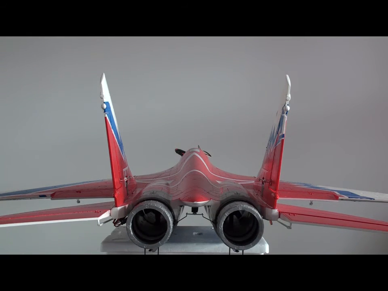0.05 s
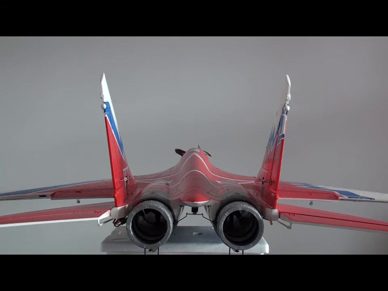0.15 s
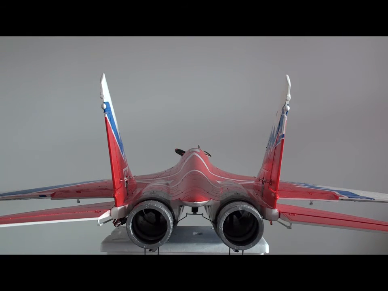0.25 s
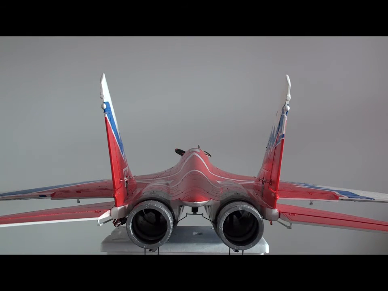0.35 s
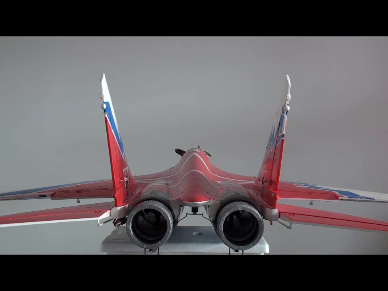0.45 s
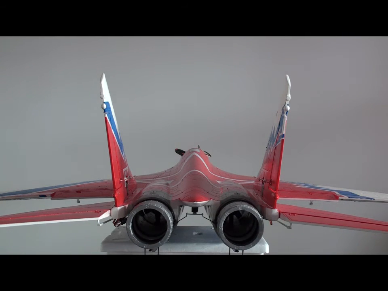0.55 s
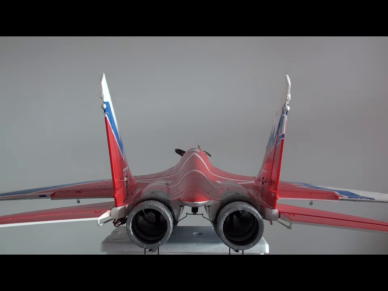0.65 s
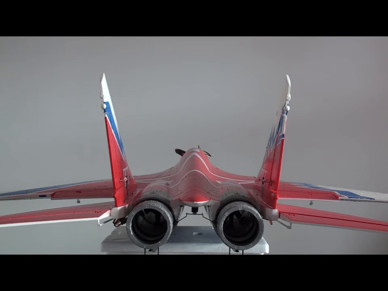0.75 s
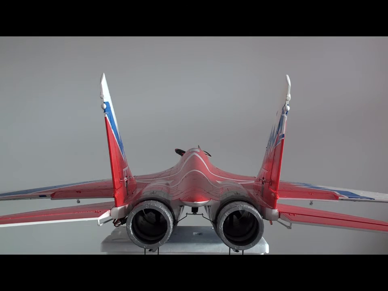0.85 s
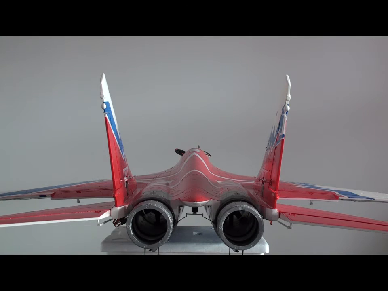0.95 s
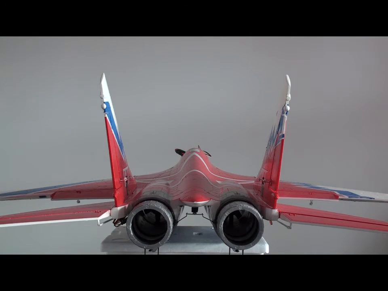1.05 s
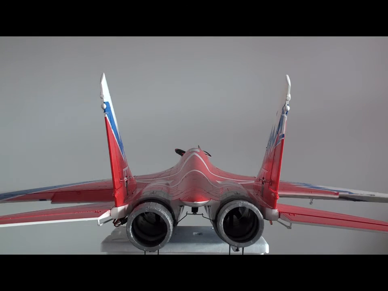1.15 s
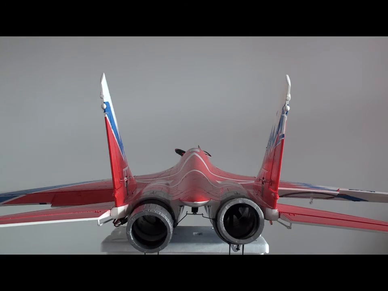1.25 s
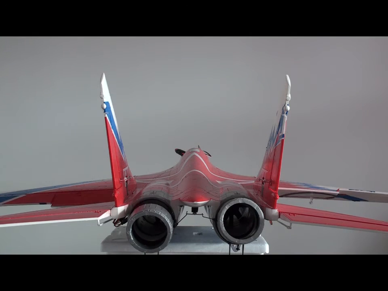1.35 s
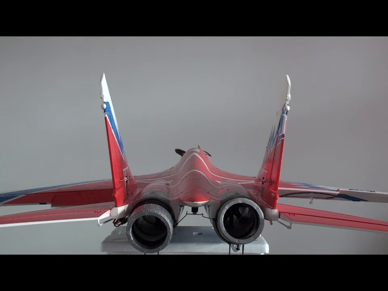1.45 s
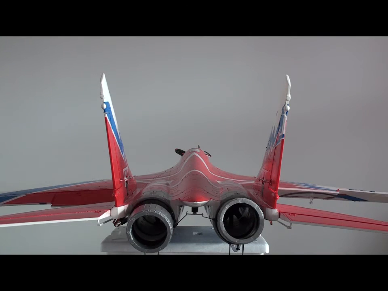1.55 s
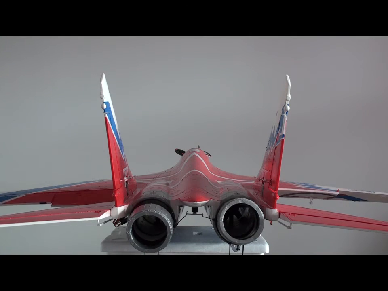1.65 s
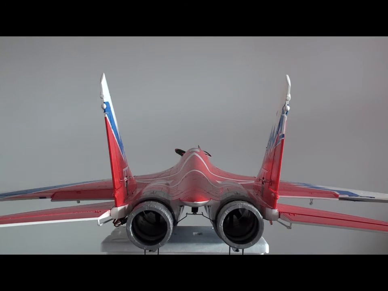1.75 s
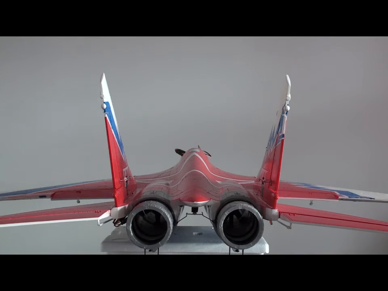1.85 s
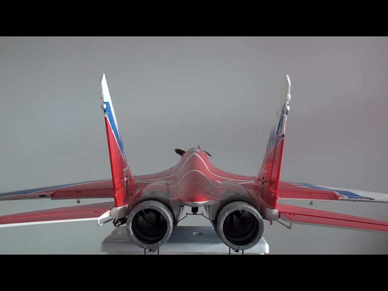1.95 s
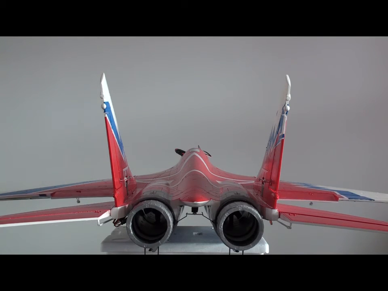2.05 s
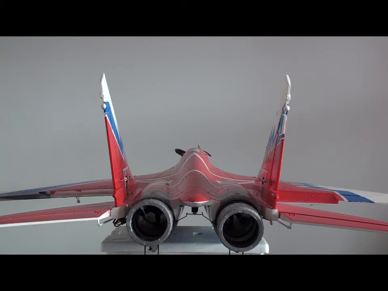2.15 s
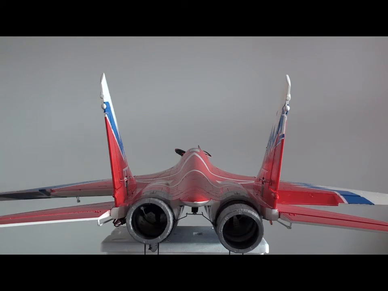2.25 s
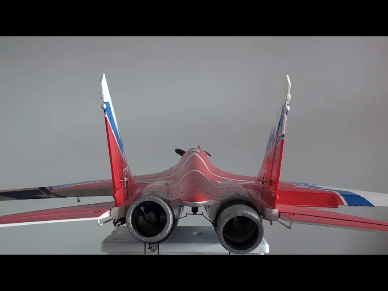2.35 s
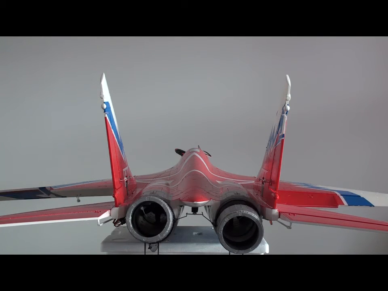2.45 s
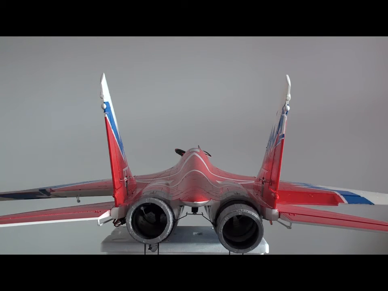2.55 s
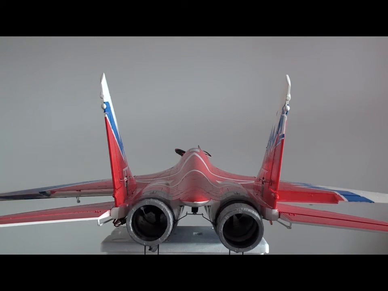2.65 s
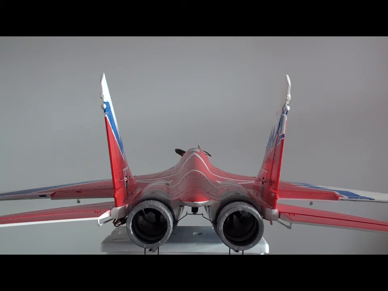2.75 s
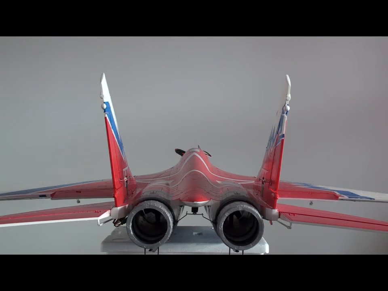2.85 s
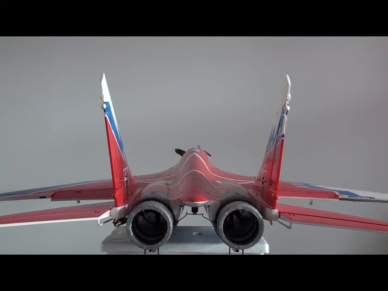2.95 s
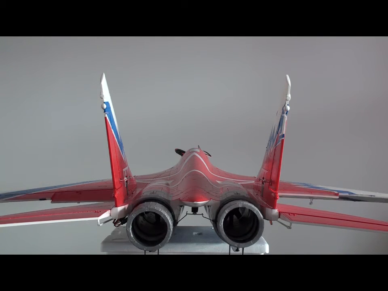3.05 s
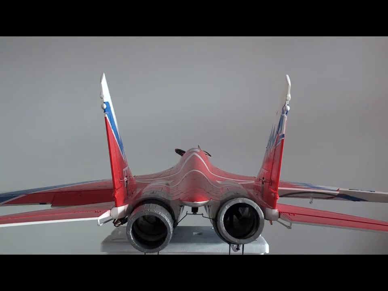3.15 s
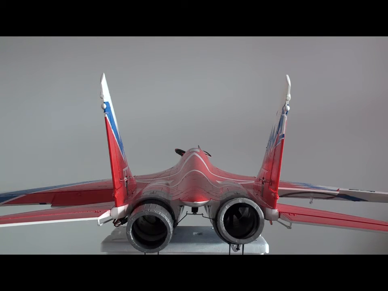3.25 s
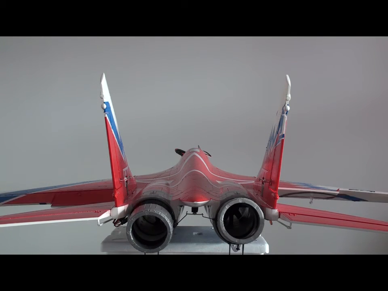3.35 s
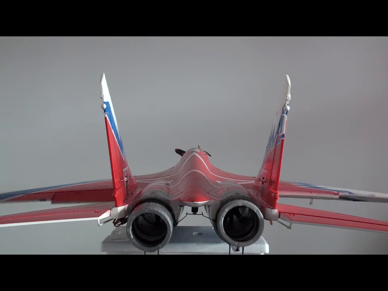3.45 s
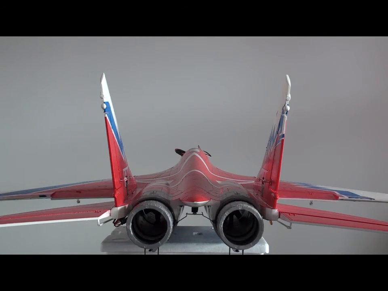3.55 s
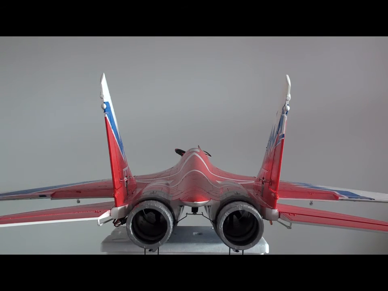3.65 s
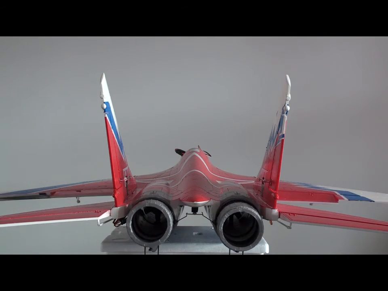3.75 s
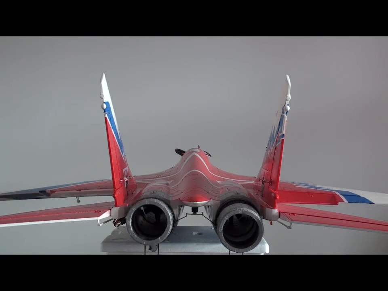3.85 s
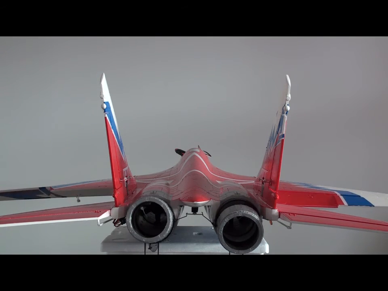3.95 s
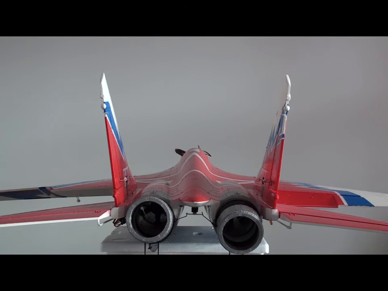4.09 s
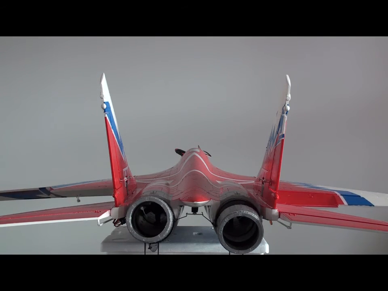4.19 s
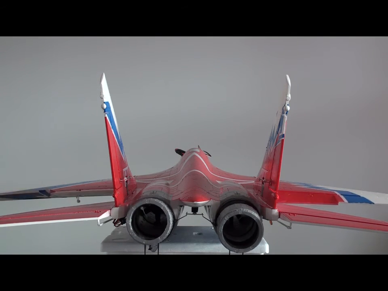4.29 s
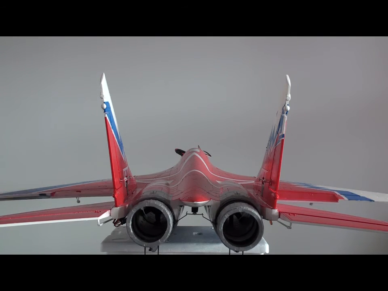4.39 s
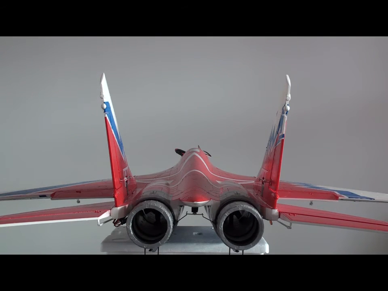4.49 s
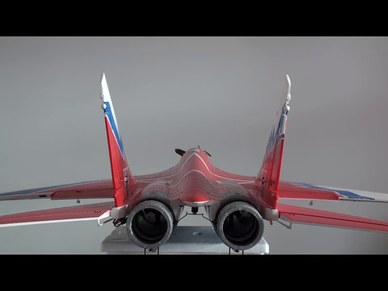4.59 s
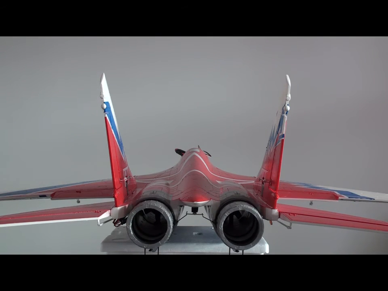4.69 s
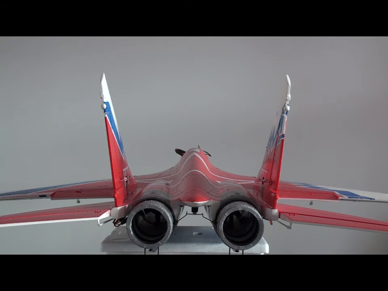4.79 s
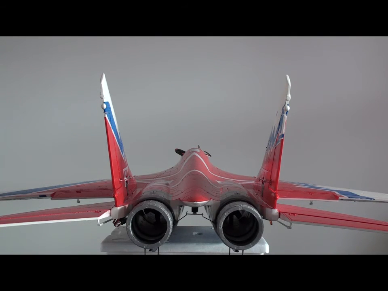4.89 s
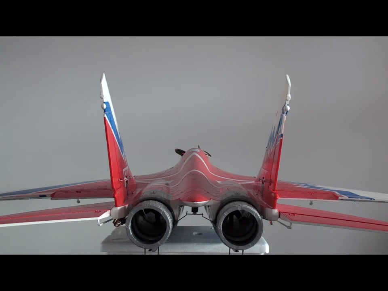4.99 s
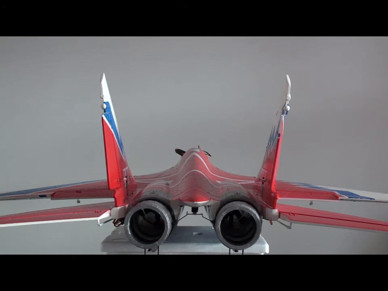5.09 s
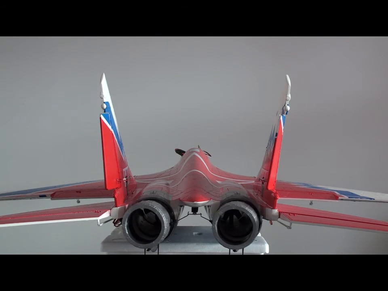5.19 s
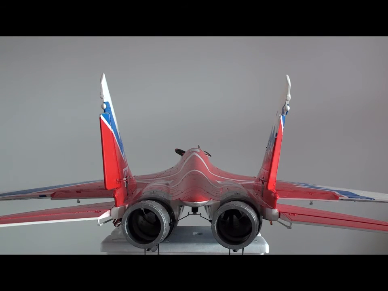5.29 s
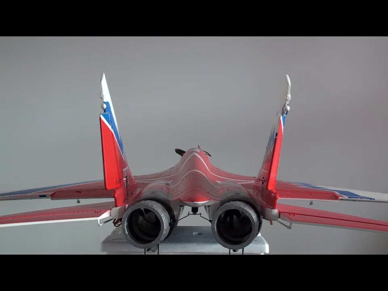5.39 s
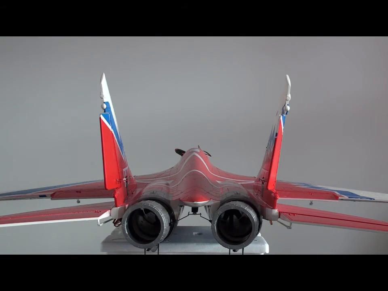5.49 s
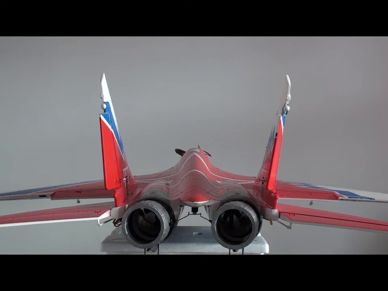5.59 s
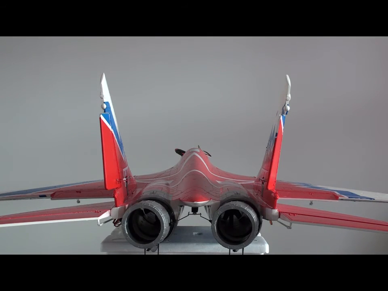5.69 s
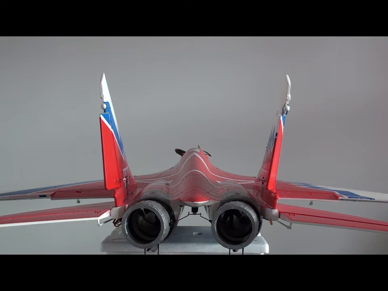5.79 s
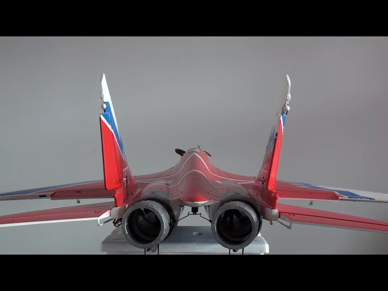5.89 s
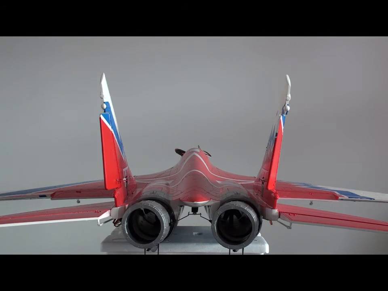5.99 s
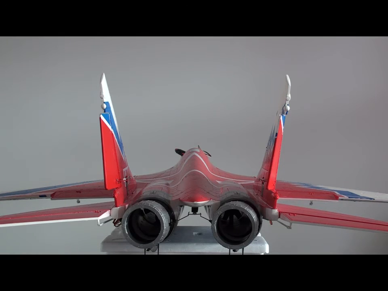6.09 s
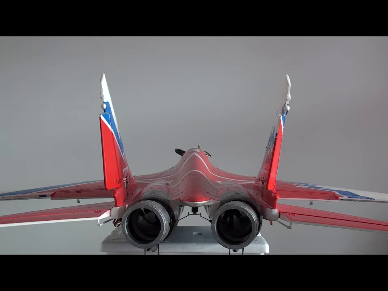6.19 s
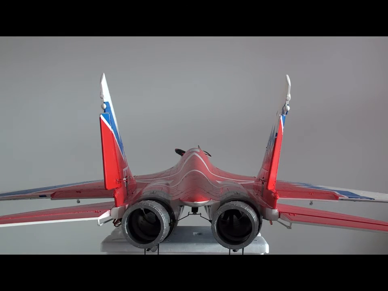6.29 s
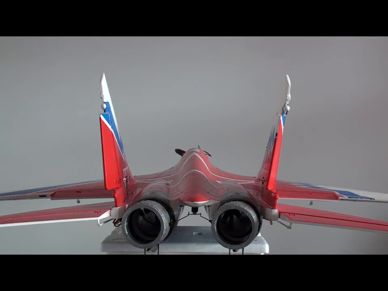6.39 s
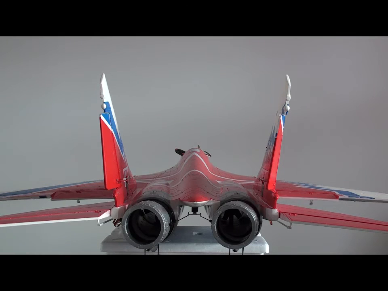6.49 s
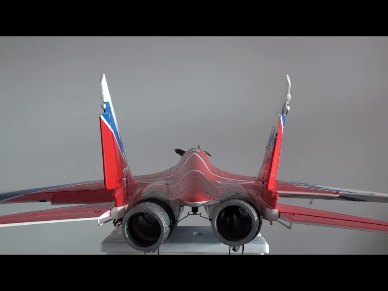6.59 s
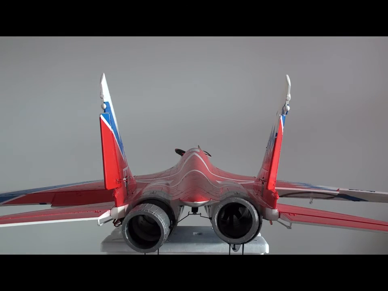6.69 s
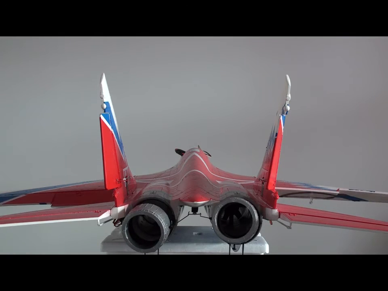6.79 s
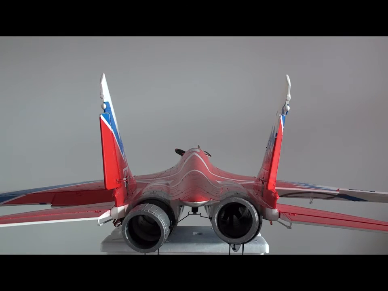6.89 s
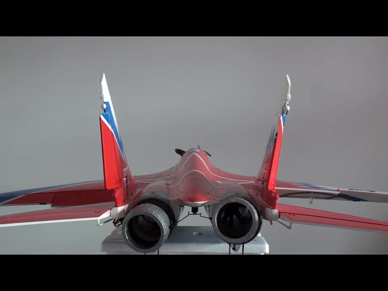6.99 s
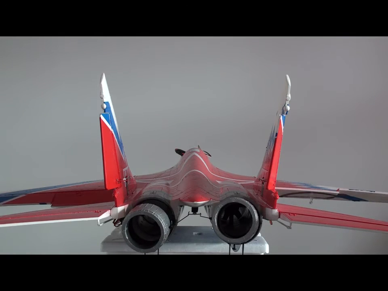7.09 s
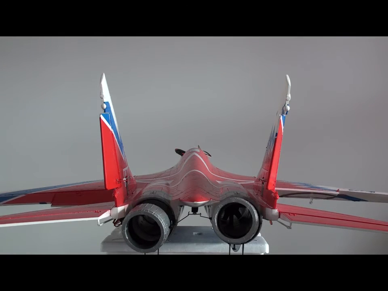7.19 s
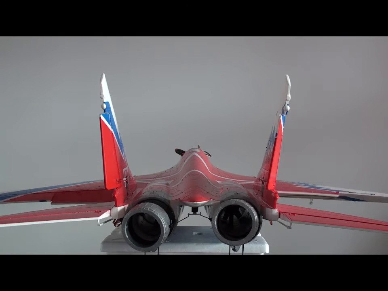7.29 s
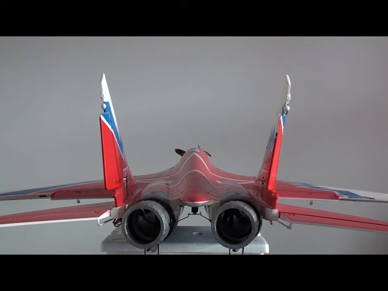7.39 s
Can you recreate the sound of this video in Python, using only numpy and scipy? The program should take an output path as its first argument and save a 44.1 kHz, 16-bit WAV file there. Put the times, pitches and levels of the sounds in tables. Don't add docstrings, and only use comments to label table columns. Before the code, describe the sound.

In a quiet room, tiny geared servos on a model jet buzz faintly and twitch at rest. After about a second, short rising whirs throw the flaps out and snap them back, rattling the hollow shell and tail pipes with soft low thuds. A lighter rudder whir follows, then ticking, one more throw and a return. Close stereo microphone, centred source, soft hiss.

```python
import sys
import numpy as np
from scipy import signal
from scipy.fft import rfft, irfft
from scipy.io import wavfile
from scipy.ndimage import uniform_filter1d

SR = 44100
rng = np.random.default_rng(int(sys.argv[2]) if len(sys.argv) > 2 else 0)


def natural_amplitude(level_db):
    exponent = np.asarray(level_db, float) / 20
    return 10 ** exponent


def inscribe(sig):
    pcm = np.round(np.clip(np.atleast_2d(sig).T, -1, 1) * 32767)
    wavfile.write(sys.argv[1], SR, pcm.astype(np.int16))


N = 328104
TIME = np.arange(N) / SR


def rms_one(x):
    return x / np.sqrt(np.mean(x ** 2) + 1e-20)


def at_hz(points, hz):
    table_hz, values = np.transpose(points)
    return np.interp(np.log(hz), np.log(table_hz), values)


def drift(rate):
    r = np.exp(-80 * np.pi * rate / SR)
    white = rng.standard_normal(N // 40 + 2002)
    slow = signal.lfilter([1], [1, -2 * r, r * r], white)[2000:]
    return np.interp(np.arange(N) / 40, np.arange(len(slow)), rms_one(slow))


def band(x, low_hz, high_hz):
    return signal.sosfilt(signal.butter(2, [low_hz, high_hz], "band", fs=SR, output="sos"), x)


def level(x, low_hz, high_hz):
    return x / np.sqrt(np.mean(band(x, low_hz, high_hz) ** 2))


def peak(x, hz, width_hz):
    r, w = np.exp(-np.pi * width_hz / SR), 2 * np.pi * hz / SR
    return signal.lfilter((1 - r * r) / 2 * np.array([1, 0, -1]), [1, -2 * r * np.cos(w), r * r], x)


def resonate(x, modes):
    for hz, width_hz, lift_db in modes:
        x = x + (natural_amplitude(lift_db) - 1) * peak(x, hz, width_hz)
    return x


def lag(x):
    return signal.lfilter([.03], [1, -.97], x)


def moves(rows, fall_db_s, clock, rest_db=-80):
    db, extra = np.full(N, rest_db * 1.), np.zeros(N)
    for s, length, start_db, end_db, *more in rows:
        stop = s + length + (end_db - rest_db) / fall_db_s
        span = slice(round(s * SR), round(stop * SR) + 1)
        age = np.maximum(clock[span] - s, 0)
        ramp = np.interp(age, [0, length], [start_db, end_db])
        own = ramp - fall_db_s * np.maximum(age - length, 0)
        extra[span] = np.where(own > db[span], sum(more), extra[span])
        db[span] = np.maximum(own, db[span])
    return db, extra


def tooth_knocks(per_s, spread_db, rasp_db):
    size_db = spread_db * np.minimum(rng.exponential(1, (2, N)), 4)
    sizes = natural_amplitude(size_db) * rng.choice([-1, 1], (2, N))
    contact = rng.random((2, N)) < per_s / SR
    return rms_one(natural_amplitude(rasp_db * drift(95)) * sizes * contact + 1e-18)


def gear_train(knocks, colour, tilt_db, patchy_db, low_hz):
    out = 0
    edges = low_hz * 2 ** np.arange(0, np.log2(17000 / low_hz), .5)
    for k, (low, high) in enumerate(zip(edges, np.append(edges[1:], 19000))):
        hz = np.sqrt(low * min(high, 1.42 * low))
        flicker = patchy_db * (drift(11.8) + 0.24 * drift(21))
        gain_db = at_hz(colour, hz) + flicker + tilt_db(hz)
        out = out + natural_amplitude(gain_db) * band(knocks[k % 2], low, high)
    return out


# (frequency [Hz], density [dB per Hz])
AIR_COLOUR = [(20, -17), (45, -1), (70, -7.5), (120, -5.5), (250, -1.5), (800, -1.5), (2500, -5),
              (6000, -14.5), (12000, -24), (16500, -24)]
# (frequency [Hz], left-right likeness [0..1])
AIR_LIKENESS = [(35, .99), (70, 0.63), (130, 0.56), (400, 0.12), (1500, 0.14), (5000, 0.6), (15000, 0.54)]
# (frequency [Hz], level [dB])
HUM = [(70.0, -76.5)]


def air():
    hz = np.maximum(np.arange(N // 2 + 1) * SR / N, 10)
    mid, side = rfft(rng.standard_normal((2, N)))
    alike = np.clip(at_hz(AIR_LIKENESS, hz), 0, 1)
    pair = np.sqrt(1 + alike) * mid + np.sqrt(1 - alike) * side * [[1], [-1]]
    noise = rms_one(irfft(pair * natural_amplitude(at_hz(AIR_COLOUR, hz)), N))
    hum = 0
    for f, db in HUM:
        hum = hum + natural_amplitude(db + 2.3 * drift(1.2)) * np.sqrt(2) * np.sin(2 * np.pi * f * TIME)
    return natural_amplitude(-54.5) * noise + hum


# (time [s], length [s], buzz at start [dB], buzz at end [dB])
BOUTS = [(0, 0.16, -50.5, -52), (0.227, 0.057, -51.5, -52), (0.337, 0.19, -52, -49.5),
         (0.576, 0.25, -52.5, -52), (0.839, 0.017, -50, -48.5), (0.922, .008, -59, -51.5),
         (0.994, 0.044, -55, -50), (1.108, 0.45, -54, -53), (1.568, 0.054, -50.5, -48),
         (1.653, 0.11, -57.5, -59), (1.743, 0.85, -52, -48.5), (2.628, .865, -47.5, -50),
         (3.5, 0.69, -49, -44.5), (4.208, 0.025, -46, -45), (4.262, 0.43, -46, -48.5),
         (4.736, 0.22, -54, -48), (4.93, 0.53, -50, -53), (5.507, 0.048, -48, -57),
         (5.548, 0.062, -49, -50.5), (5.691, 0.032, -54, -48.5), (5.732, .07, -55, -49),
         (5.802, 0.069, -52, -50), (5.927, 0.067, -55.5, -47.5), (5.98, 0.13, -51.5, -48.5),
         (6.149, 0.078, -51, -50), (6.298, 0.23, -51.5, -51), (6.55, 0.61, -54, -50.5),
         (6.992, 0.22, -51, -54.5), (7.2, 0.05, -49, -50), (7.247, 0.22, -58.5, -44)]
# (frequency [Hz], density [dB per Hz])
HUNT_COLOUR = [(400, -28), (700, -2), (1200, -4.5), (1900, -3), (2600, -3), (4000, -2), (5800, -8),
               (6600, -12.5), (9000, -15), (10000, -25.5), (16000, -43)]
# (frequency [Hz], width [Hz], lift [dB])
HUNT_MODES = [(1490, 100, 4), (2100, 90, 5), (2260, 150, 7), (2440, 70, 4), (2990, 170, 7.5),
              (3760, 140, 5), (4410, 80, 4), (5400, 300, 5), (5870, 80, 4), (7300, 120, 3), (8820, 120, 5)]


def hunting():
    buzz_db = moves(BOUTS, 250, TIME, rest_db=-68)[0] + .8 * drift(9.8)
    fresh = [(s, .001, 0, 0) for s, *_ in BOUTS]
    fizz_db = 0.5 * drift(15) + moves(fresh, 42, TIME, rest_db=-0.52)[0]

    def tilt_db(hz):
        return (fizz_db + 2.0) * np.interp(np.log(hz), np.log([5000, 8500]), [0, 1])

    knocks = tooth_knocks(6000, 3.2, rasp_db=-0.24)
    body = gear_train(knocks, HUNT_COLOUR, tilt_db, patchy_db=0.6, low_hz=517)
    return resonate(lag(natural_amplitude(buzz_db - 1.5)) * level(body, 1300, 7300), HUNT_MODES)


# (frequency [Hz], reverberation time T60 [s])
ROOM_T60 = [(100, 0.24), (1000, 0.26), (5000, 0.12), (15000, 0.023)]
# (frequency [Hz], level [dB])
ROOM_COLOUR = [(100, 13), (700, 12), (3000, 12.5), (8000, 8), (14000, 18)]


def room(x):
    age = np.arange(round(.5 * SR)) / SR
    white, tail = rng.standard_normal((2, len(age))), 0
    for low in 80 * 2. ** np.arange(8):
        t60 = at_hz(ROOM_T60, low * 1.4)
        decay = natural_amplitude(at_hz(ROOM_COLOUR, low * 1.4) - 60 * age / t60)
        tail = tail + band(white, low, min(2 * low, 19000)) * decay / np.sqrt(t60)
    tail = tail * (age > .002) / np.sqrt(SR / 14)
    return signal.fftconvolve(x[None], tail, axes=1)[:, :N]


# (time [s], peak [dB])
TWITCHES = [(.4673, -40), (.5214, -41), (.6285, -41), (.7692, -44), (1.117, -41), (1.1837, -26.5),
            (1.5594, -43), (1.7579, -35), (2.1131, -34), (2.6324, -33), (2.9854, -33), (3.062, -34),
            (3.0939, -25.5), (3.5144, -32), (3.8004, -30), (4.259, -34), (4.9454, -34), (4.9494, -32),
            (5.004, -27), (5.2317, -26), (5.551, -38), (5.8012, -39.5), (5.9748, -53), (6.1449, -43),
            (6.3003, -38.5), (6.5684, -39), (6.5884, -40), (7.0848, -42), (7.3248, -29.5), (7.3687, -22)]
# (frequency [Hz], width [Hz], lift [dB])
TWITCH_MODES = [(4970, 340, 8.5), (7560, 240, 8.5), (8600, 230, 5), (11600, 850, 5.5)]


def twitches():
    opening = [(s, start_db + 1) for s, _, start_db, _ in BOUTS[1:]]
    rows = TWITCHES + opening
    out, age = np.zeros(N), np.arange(round(.08 * SR)) / SR
    draws = rng.standard_normal((len(rows), 2, len(age)))
    for (s, peak_db), (noise, size) in zip(rows, draws):
        spray = rms_one(noise * natural_amplitude(5 * size)) * natural_amplitude(-60 * age / .08)
        hz = 7300 * (1 + .07 * size[-1])
        tuned = band(spray, hz / 1.46, min(hz * 1.08, 16000)) * 0.5
        tuned = tuned + band(spray, 2500, 10500) * 0.5
        i = round(s * SR)
        out[i:i + len(age)] += natural_amplitude(peak_db - 6) * tuned[:N - i]
    return resonate(out, TWITCH_MODES)


# (time [s], level [dB])
NOZZLES = [
    (1.1, -0.5),
    (2.5, -4),
    (2.75, -0.5),
    (3.05, 0.5),
    (3.65, -2),
    (4.2, 3.5),
    (4.5, -5.5),
    (7.44, 0),
]


def tail_pipe(knocks, drive_db):
    pipe_hz, width_hz = 722, 45
    shaking_db = np.interp(TIME, *np.transpose(NOZZLES))
    ring = peak(lag(natural_amplitude(drive_db + shaking_db)) * knocks, pipe_hz, width_hz)
    return ring * np.sqrt(SR / np.pi / width_hz)


def sweeps(groups, laws, colour, modes, drone_db, fizz_db, step_db):
    frame_s, first_frame_s = .02198, .0199
    since = (TIME - first_frame_s) % frame_s
    stepped = TIME + 0.18 * (frame_s / 2 - since)
    pairs = [moves(rows, fall_db_s, stepped) for rows, fall_db_s in groups]
    levels, loads = np.transpose(pairs, (1, 0, 2))
    rattle = levels.max(0)
    load = uniform_filter1d(np.choose(levels.argmax(0), loads), size=300)

    speed = np.maximum(rattle, -58) + 30
    drone, fizz, pipe = (laws[k][0] + laws[k][1] * speed for k in ("drone", "fizz", "pipe"))
    fizz = np.minimum(fizz, laws["fizz"][0] + laws["fizz"][1] * (-27.5 + 30))
    kick_db = step_db * np.exp(-since / 0.013) * np.clip(.75 + 0.7 * speed, .45, 1.3)

    def tilt_db(hz):
        dark = np.interp(np.log(hz), np.log([1200, 2000, 3500]), [1, .35, 0])
        bright = np.interp(np.log(hz), np.log([1990, 4130, 8350, 14000]), [-0.28, -0.0075, 1.24, 1.87])
        return (drone + load + drone_db) * dark + (fizz + fizz_db) * bright + kick_db * (.5 + bright)

    knocks = tooth_knocks(6500, 2.24, rasp_db=1.0)
    body = gear_train(knocks, colour, tilt_db, patchy_db=0.87, low_hz=109.3)
    body = signal.sosfilt(signal.butter(4, 9260, fs=SR, output="sos"), body)
    hollow = tail_pipe(knocks[0], rattle + pipe + 0.52 * load)
    return resonate(lag(natural_amplitude(rattle - 2.0)) * level(body, 2380, 5700), modes) + hollow


# (time [s], length [s], gear rattle at start [dB], rattle at end [dB], shell load [dB])
THROWS = [(1.116, .065, -41, -40.5, -4), (1.181, 0.12, -39.5, -29.5, 5), (1.282, 0.073, -30.5, -26, -1),
          (2.061, .012, -43, -43, -2), (2.108, 0.0038, -30, -43, 6.5), (2.135, 0.3, -39, -29.5, 1.5),
          (2.985, 0.058, -41, -40, 4.5), (3.053, 0.11, -43, -30.5, 4.5), (3.189, 0.039, -29.5, -27, 0.5),
          (3.224, 0.029, -24.5, -25.5, 1.5), (3.776, 0.1, -39.5, -34.5, 5), (3.894, 0.15, -31, -34.5, 1.5),
          (4.026, 0.053, -32.5, -29.5, 2), (6.545, 0.083, -45.5, -36.5, 1), (6.64, .06, -32.5, -30, 3),
          (6.7, 0.097, -31, -26.5, -1)]
# (time [s], length [s], gear rattle at start [dB], rattle at end [dB], shell load [dB])
RETURNS = [(1.755, .035, -45, -32.5, 2.5), (1.79, .031, -30.5, -29.5, 3.5), (1.821, 0.052, -29, -29.5, 4.5),
           (1.957, 0.033, -39, -36, 1.5), (2.632, 0.033, -41.5, -30.5, 2), (2.67, 0.032, -30, -30, 1),
           (2.764, 0.047, -33.5, -29.5, 2.5), (2.87, 0.016, -38, -37, 3.5), (3.513, 0.039, -53, -26.5, 5),
           (3.555, 0.052, -28, -26, 6.5), (4.259, .022, -37, -40, 0), (4.29, 0.16, -40, -30, 2),
           (4.432, 0.078, -31.5, -29.5, 2.5), (7.313, 0.047, -43.5, -29, 1.5),
           (7.403, .04, -34, -29.5, 0.5)]
SWEEP_LAWS = {"drone": (-13.5, -0.23), "fizz": (-7, 0.43), "pipe": (-17, -0.11)}
# (frequency [Hz], density [dB per Hz])
SWEEP_COLOUR = [(90, -39), (150, -30), (230, -14), (400, -13.5), (700, -6), (1100, -8.5), (2000, -4),
                (3700, 1.5), (5100, 1), (8000, -4), (11300, -6), (13500, -10), (16000, -0.5)]
# (frequency [Hz], width [Hz], lift [dB])
SWEEP_MODES = [(1910, 40, 5), (3087, 30, 2.5), (3545, 45, 3), (3780, 50, 3), (4395, 30, 5), (4813, 30, 4),
               (4936, 25, 5), (5590, 40, 4), (7220, 40, 3), (8150, 30, 5), (11300, 700, 3), (11433, 20, 4)]
# (frequency [Hz], width [Hz], lift [dB])
SHELL_MODES = [(422, 58, -9), (574, 120, 0), (835, 210, -2), (1160, 53, 2.5)]


def flap_sweeps():
    groups = [(THROWS, 197), (RETURNS, 137)]
    return sweeps(groups, SWEEP_LAWS, SWEEP_COLOUR, SWEEP_MODES + SHELL_MODES,
                  drone_db=15.0, fizz_db=9, step_db=2.0)


# (time [s], peak [dB], frequency [Hz], T60 [s])
ROCKS = [
    (1.189, -47, 300, 0.18),
    (1.331, -58, 180, 0.23),
    (3.281, -47, 171, 0.14),
    (3.56, -44, 234, 0.2),
    (5.01, -47, 344, .2),
    (5.296, -45, 227, .2),
    (5.33, -47, 253, 0.29),
    (5.5, -58, 165, 0.35),
    (6.8, -51, 185, 0.21),
    (7.02, -63.5, 158, 1),
]


def rocks():
    out = np.zeros(N)
    for s, peak_db, hz, t60 in ROCKS:
        age = np.maximum(TIME - s, 0)
        swell = (1 - np.exp(-age / 0.0076)) * natural_amplitude(peak_db - 60 * age / t60)
        out += swell * np.sin(2 * np.pi * hz * age * (1 - 0.023 * age))
    return out


# (time [s], length [s], gear rattle at start [dB], rattle at end [dB], shell load [dB])
RUDDER_SWINGS = [
    (4.905, .038, -54, -47, -4),
    (4.945, 0.018, -42, -44.5, -4),
    (5.003, .032, -43, -41, 8.5),
    (5.063, .058, -46.5, -41, 0),
    (5.125, .075, -41, -38.5, -1),
    (5.2, 0.072, -39, -33, 0.5),
    (5.273, 0.028, -35, -33.5, 2),
    (5.395, 0.026, -54, -51, -6),
]
RUDDER_LAWS = {"drone": (-16.5, .01), "fizz": (-1.7, 0.38), "pipe": (-22, .01)}
# (frequency [Hz], density [dB per Hz])
RUDDER_COLOUR = [(120, -25), (230, -17.5), (640, -10.5), (1300, -5.5), (2200, -4), (3500, 4.5), (5500, 0),
                 (8300, -2), (10500, -15), (16000, 2)]
# (frequency [Hz], width [Hz], lift [dB])
RUDDER_MODES = [(3080, 90, 2), (4500, 80, 4), (5700, 80, 3), (7500, 130, 4), (8000, 600, 3), (8700, 400, 5),
                (11200, 700, 6)]


def rudder_sweeps():
    groups = [(RUDDER_SWINGS, 211)]
    return sweeps(groups, RUDDER_LAWS, RUDDER_COLOUR, RUDDER_MODES,
                  drone_db=18.5, fizz_db=4.5, step_db=1.0)


def scene():
    buzz = hunting()
    servos = twitches() + flap_sweeps() + rocks() + rudder_sweeps()
    direct = servos + buzz * natural_amplitude(np.array([[.05], [-.05]]))
    return direct + natural_amplitude(-12.5) * room(servos + buzz) + air()


def band_limit(x):
    return signal.sosfilt(signal.butter(12, 16220, fs=SR, output="sos"), x)


# (frequency [Hz], left minus right [dB])
PORT_TILT_DB = [(100, 0.12), (600, -0.81), (2500, -0.67), (8000, 0.4)]


def record(dry):
    hz = np.maximum(np.arange(N // 2 + 1) * SR / N, 10)
    ports = natural_amplitude(at_hz(PORT_TILT_DB, hz) / 2 * [[1], [-1]]) * (hz < 15830)
    mix = irfft(rfft(dry) * ports, N)
    return band_limit(mix)


dry = scene()
out = record(dry)
inscribe(out)
```